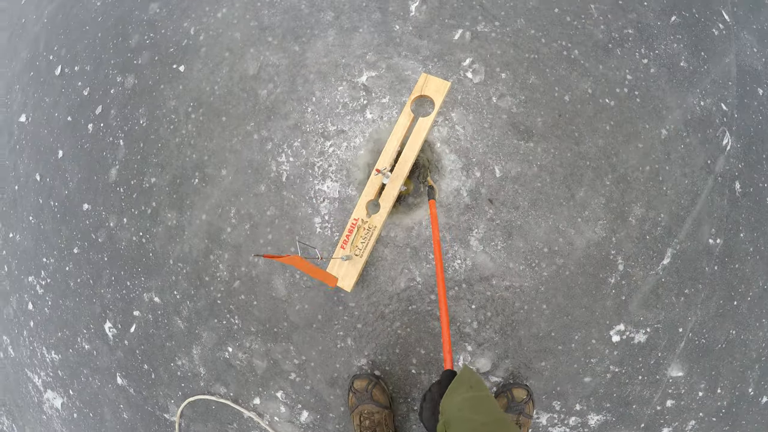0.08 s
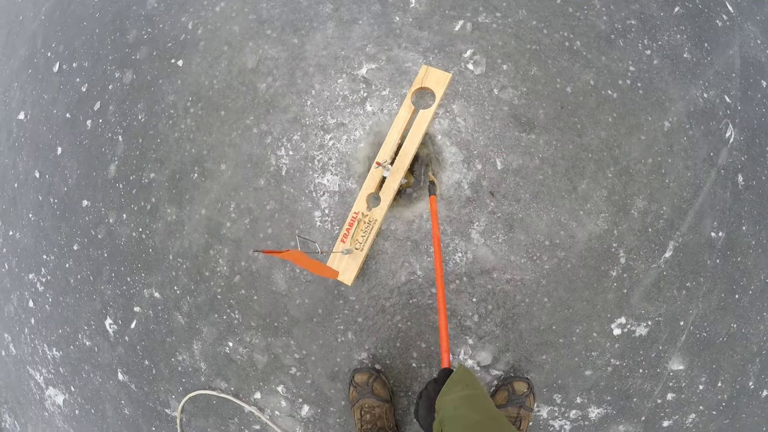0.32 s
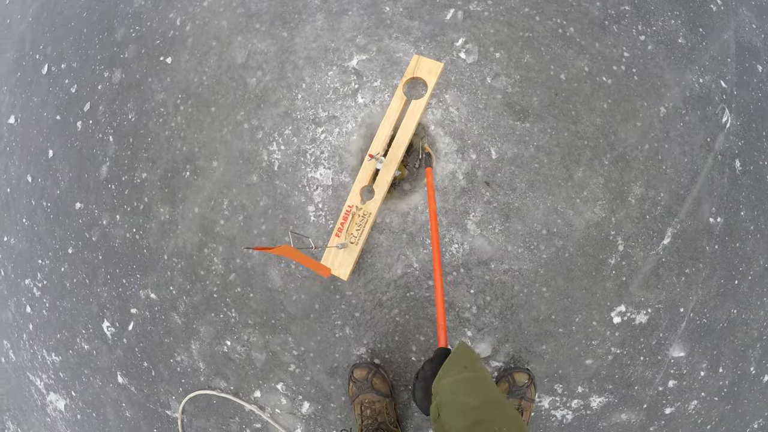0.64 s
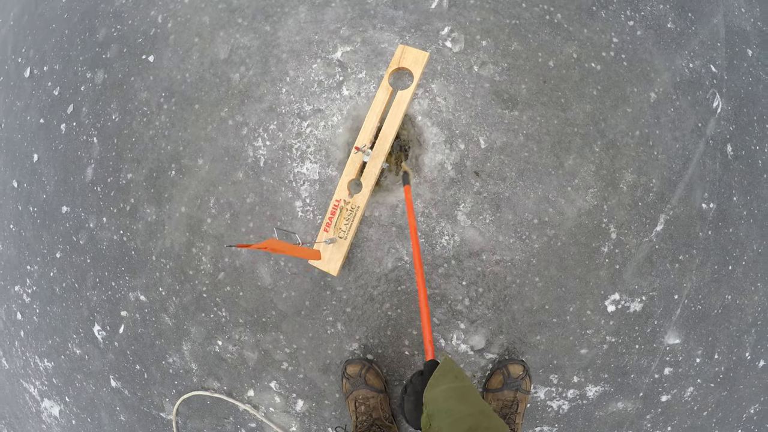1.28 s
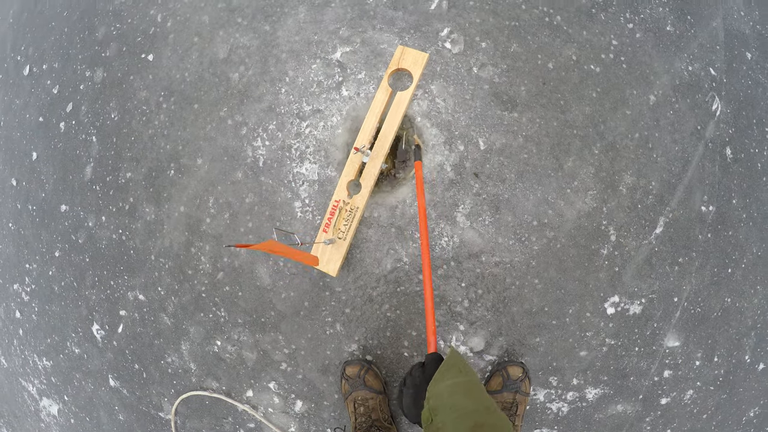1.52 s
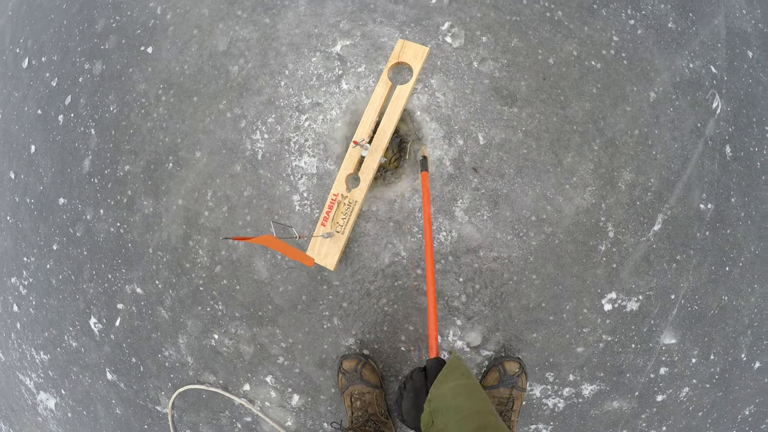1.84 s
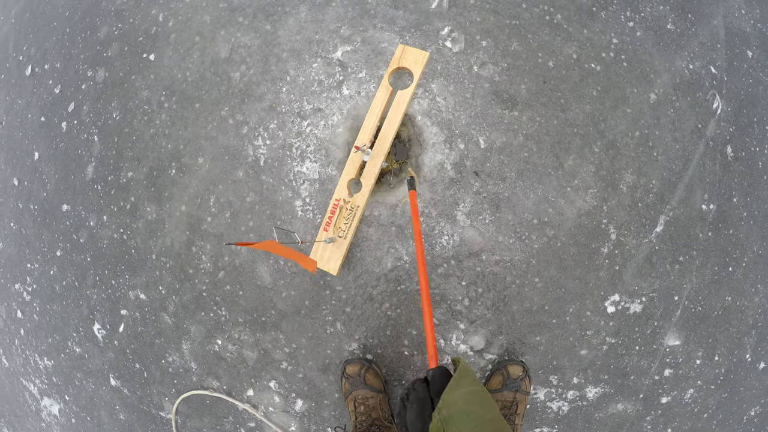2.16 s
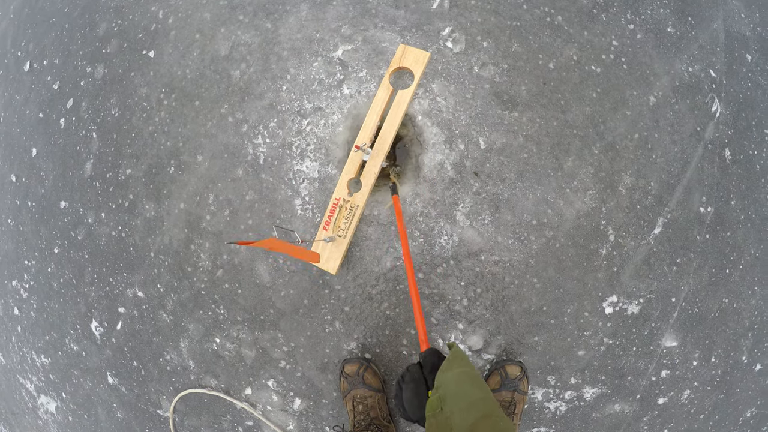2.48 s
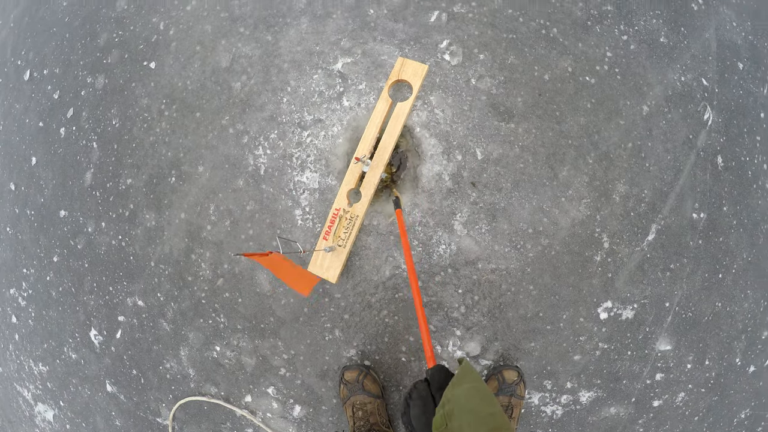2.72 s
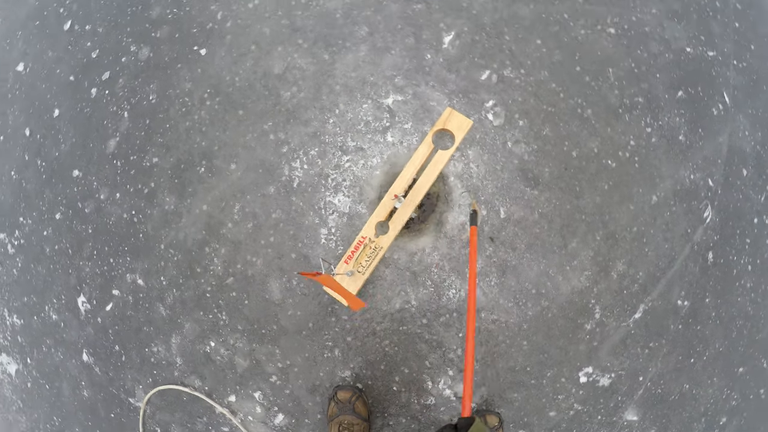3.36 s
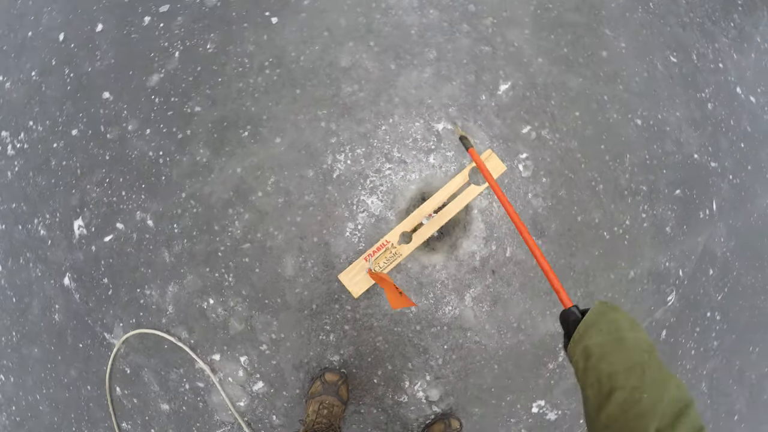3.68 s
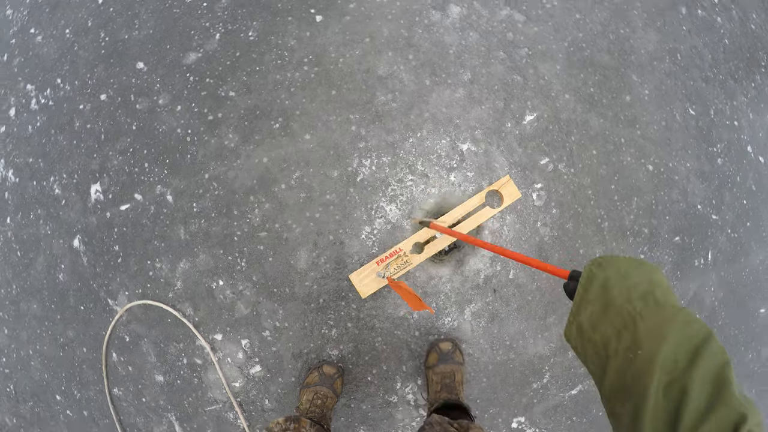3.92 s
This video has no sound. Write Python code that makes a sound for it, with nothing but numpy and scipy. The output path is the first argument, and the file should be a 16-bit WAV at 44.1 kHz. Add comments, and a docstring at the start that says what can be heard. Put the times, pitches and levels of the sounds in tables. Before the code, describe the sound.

Short chops and light scrapes at an ice fishing hole, with wind buffeting the microphone.

```python
"""A long-handled skimmer clears slush from a fishing hole in lake ice, about a metre below the microphone.
First come small chops, each a crunch of tiny fractures, and light scrapes. From half a second on, gusts
buffet the microphone. Two dull knocks follow, then the hardest chops (1.2 and 1.7 s), and loose chips and
drops plink in the hole. After a longer drag at 2.5 s the chops thin out. The strongest gust comes at 3.5 s,
then a last low knock. A limiter holds the wind's peaks, and the open lake gives no echo."""
import sys
import numpy as np
from scipy import signal
from scipy.fft import rfft, irfft, next_fast_len
from scipy.io import wavfile
from scipy.ndimage import uniform_filter1d, minimum_filter1d, map_coordinates

SR = 44100
rng = np.random.default_rng(int(sys.argv[2]) if len(sys.argv) > 2 else 0)


def to_wav(s):
    """Save 16-bit WAV."""
    ch = np.atleast_2d(s).T  # columns
    pcm = np.round(np.clip(ch, -1, 1) * 32767)  # PCM
    wavfile.write(sys.argv[1], SR, pcm.astype(np.int16))


N = 176400  # 4 seconds

# Faint background hiss, swelling near the end with a soft sleeve rustle.
# Each row: time in seconds, level in dB.
HISS_LEVELS = [(0, -51), (2.3, -52), (3.6, -52), (3.8, -48)]
# Tone of that hiss. Each row: frequency in Hz, level in dB.
HISS_TONE = [(100, 9), (2000, -6.5), (3500, -15.5), (6000, -19.5), (15000, -31.5)]
# Deep rumble under the wind. Each row: time in seconds, level in dB.
RUMBLE_LEVELS = [(0, -25.5), (1.7, -27), (2, -39.5), (2.62, -12), (2.72, -31), (2.86, -20), (2.96, -39),
                 (3.24, -19.5), (3.33, -28.5), (3.45, -7.5), (3.68, -26.5), (3.95, -23.5)]
# Tone of that rumble. Each row: frequency in Hz, level in dB.
RUMBLE_TONE = [(10, -3.5), (28, 2.5), (55, -2), (180, -17), (400, -55), (1000, -84)]
# Breeze between the gusts. Each row: time in seconds, strength in dB.
BREEZE_STRENGTHS = [(0, -27), (.18, -26.5), (.32, -27.5), (.37, -44), (.46, -45.5), (.52, -26), (.8, -27),
                    (1.02, -31), (1.22, -34.5), (1.3, -24), (1.62, -29), (1.94, -25), (2.1, -34.5),
                    (2.17, -26.5), (2.35, -37), (2.44, -28), (2.66, -36.5), (2.7, -28), (2.77, -45.5),
                    (3, -29.5), (3.15, -38), (3.3, -37), (3.38, -26), (3.62, -37.5), (3.92, -50), (4, -35)]
# Gusts. Each row: start in seconds, length in seconds, strength in dB, extra for large eddies in dB.
WIND_GUSTS = [(0.513, 0.02, -24, 3.5), (0.547, 0.028, -18, -2.5), (0.674, 0.022, -25, 7),
              (0.834, 0.056, -20.5, 3), (0.904, 0.042, -16.5, 5.5), (1.249, 0.052, -24, 8),
              (1.338, 0.094, -20, 3.5), (1.456, 0.1, -16, -2), (1.715, 0.021, -18.5, -3),
              (1.782, 0.005, -19.5, -4), (1.838, 0.09, -19, 2.5), (2.056, 0.021, -19, 4),
              (2.546, 0.028, -19.5, -6), (3.055, 0.034, -16, -0.5), (3.409, 0.027, -15.5, -12),
              (3.442, 0.061, -11.5, -9.5), (3.525, 0.054, -16, -1.5)]
# Eddies (swirls of air) on the microphone. Each row: centre frequency in Hz, level at full wind in dB,
# dB gained for each dB of wind, flutter in dB.
EDDY_BANDS = [(55.7, -16, 0.9, 3), (129.4, -15.5, 1.22, 2), (246.6, -14.5, 1.1855, 5),
              (475.6, -19.5, 2.03, 2.5), (797, -29.5, 2.25, 11.5), (1710, -77, 7.5, 14)]
FULL_WIND_DB, GUST_EDGE_DB_PER_S = -16, 1582
LARGE_EDDY_HZ = 200  # eddies below this pitch count as large

# Knocks on the ice. Each row: start in seconds, level in dB, pitch in Hz.
ICE_KNOCKS = [(0.6764, 1.5, 189), (1.1283, -3, 430), (3.843, -4.5, 55.6)]
# Chips and drops landing. Each row: start in seconds, level in dB, pitch in Hz, fade time in cycles.
CHIP_PLINKS = [(1.1847, -20, 4760, 5.4), (1.211, -23, 2900, 6), (1.217, -8, 4300, 2.6),
               (1.4024, -21.5, 2620, 3.3), (1.441, -24, 4730, 2.5), (1.4665, -32.5, 6300, 6.6),
               (1.6489, -15.5, 4800, 22), (1.663, -13, 3300, 3.4), (1.6958, -7, 4980, 6.2),
               (1.7716, -34, 4480, 5), (1.841, -21, 3800, 6.7), (2.228, -36.5, 2650, 9.9),
               (2.4044, -20, 3030, 3.1), (2.686, -28.5, 3060, 7.2), (2.886, -36, 3440, 5.6)]
SNAP_DB, SNAP_FADE_S = -13, 0.002  # the snap that starts a plink
# Hollow notes of the hole. Each row: pitch in Hz, width in Hz, level in dB.
HOLE_NOTES = [(780, 114, -0.5), (1145, 150, -0.5), (1805, 180, -6)]

# Strokes that crush the slush. Each row: start in seconds, length in seconds, level in dB,
# and how far the hole's ring lies above that level in dB.
SLUSH_STROKES = [(.003, 0.0023, -21.5, -4), (0.013, 0.0025, -32.5, 10.5), (0.041, 0.0034, -39.5, -16),
                 (.076, 0.0033, -46.5, -10), (.253, 0.0056, -45.5, 3), (0.368, .003, -40, -3),
                 (0.375, 0.019, -44.5, -0.5), (0.405, 0.014, -44, -9), (0.458, .004, -45, -5),
                 (0.6742, 0.0057, -28.5, 3.5), (.686, .022, -36, 2.5), (0.7861, 0.0019, -30.5, 0),
                 (1.1733, 0.015, -20, -11), (1.2116, 0.011, -19.5, -14), (1.314, 0.0034, -36.5, 12.5),
                 (1.362, 0.0013, -33, 12), (1.651, 0.019, -25.5, -7), (1.6922, 0.0006, -21, -9),
                 (1.695, .0018, -14.5, -9.5), (1.833, 0.021, -39.5, -1), (2.043, 0.0088, -36.5, 0),
                 (2.4044, 0.00084, -31, -17), (2.455, .092, -36.5, -2.5), (2.469, 0.0096, -26, -4),
                 (2.516, 0.0028, -29, 1), (2.543, 0.003, -32.5, 5), (2.774, 0.017, -38, -15),
                 (2.794, 0.0041, -32.5, -21), (2.812, 0.0023, -26.5, -18), (3.002, 0.0062, -36, -3),
                 (3.7775, 0.0014, -40.5, -15)]
DRAG_S = 0.02  # strokes at least this long drag
RISE_S, RELEASE_S = 0.0003, 0.0015
SETTLE_DB, SETTLE_S = -13.5, 0.011  # crumbs settling after each stroke
# Tone of breaking slush. Each row: frequency in Hz, level in dB.
SLUSH_TONE = [(150, -19), (500, 5.5), (1300, -8.5), (2800, 2), (5000, 0.5), (7000, -5.5), (10000, -14.5),
              (14000, -14), (16000, -22)]
CLUMP_DB, CLUMPS_PER_S = 5.5, 1100
GRAIN_HZ, GRAIN_SCATTER_DB = 4200, 4
# Light scrapes along the rim. Each row: start in seconds, length in seconds, level in dB.
RIM_SCRAPES = [(.12, 0.21, -61.5), (.37, 0.14, -55), (1.225, 0.16, -51), (2.07, 0.023, -52.5),
               (2.58, .2, -53), (2.925, 0.094, -52), (3.186, 0.05, -49.5)]
# Gritty tone of scraping. Each row: frequency in Hz, level in dB.
GRIT_TONE = [(800, -5), (2500, 3), (5500, -0.5), (7500, -10.5), (15000, -21)]
CATCH_DB, CATCHES_PER_S = 5.5, 85  # the skimmer sticks and slips
# Notes of the skimmer's cup. Each row: pitch in Hz, level in dB.
CUP_NOTES = [(1137, 2), (2300, -2.5), (2845, -4), (4160, -2.5), (4800, -6.5), (5200, -4), (5750, -8)]
CUP_WIDTH_HZ = 54

CEILING, LIMITER_S, TOP_HZ = 0.94, 0.008, 15600


def amp(db):
    """Turn decibels into a gain."""
    return 10 ** (np.asarray(db) / 20)


def unit(x):
    """Scale a signal to an average (rms) level of 1."""
    return x / np.sqrt(np.mean(x ** 2) + 1e-20)


def curve(rows):
    """Join (time, value) points into one value per sample."""
    return np.interp(np.arange(N) / SR, *np.transpose(rows))


def wobble(per_s):
    """A smooth curve through per_s random points a second."""
    return map_coordinates(rng.standard_normal(8192), [np.arange(N) * per_s / SR], mode="wrap")


def jolts(per_s):
    """Unevenly spaced jolts; each hits at once and fades until the next."""
    count = np.cumsum(per_s * np.exp(0.5 * wobble(per_s))) / SR
    height = rng.uniform(-0.5, 0.5, 4096)[count.astype(int) % 4096]
    jolt = height - count % 1
    return unit(jolt - jolt.mean())


def filtered(x, response):
    """Filter x; response gives the gain at each frequency in Hz."""
    size = next_fast_len(N + 8192)
    return irfft(rfft(x, size) * response(np.fft.rfftfreq(size, 1 / SR) + 0.01), size)[:N]


def noise(tone):
    """Noise of level 1, shaped by a tone table."""
    hz, db = np.transpose(tone)
    return unit(filtered(rng.standard_normal(N), lambda f: amp(np.interp(np.log(f), np.log(hz), db))))


def even(x, span_s):
    """Iron out swells slower than span_s, leaving a level of 1."""
    span = int(span_s * SR) + 1
    power = uniform_filter1d(uniform_filter1d(x * x, span), span)
    return unit(x / np.sqrt(abs(power) + 1e-9))


def rings(start_s, gain, hz, cycles, samples=800):
    """Add up short fading tones that bend slightly up in pitch."""
    t = np.arange(samples) / SR
    age = t * (hz / cycles)[:, None]
    bend = 1 + 0.016 * age
    tones = gain[:, None] * np.exp(-age) * np.sin(2 * np.pi * hz[:, None] * t * bend)
    where = (start_s * SR).astype(int)[:, None] + np.arange(samples)
    return np.bincount(where.ravel(), tones.ravel(), N)[:N]


def bursts(rows, release_s):
    """A loudness curve from (start, length, dB) rows: each rises fast, holds, then fades."""
    t = np.arange(SR // 2) / SR
    power = np.zeros(N + SR)
    for start, length, db in rows:
        shape = np.clip(t / RISE_S, 0, 1) * np.exp(-np.maximum(t - length, 0) / release_s)
        power[int(start * SR):][:len(t)] += (amp(db) * shape) ** 2
    return np.sqrt(power[:N])


def background_hiss():
    """Faint background hiss, swelling near the end with a soft sleeve rustle."""
    return amp(curve(HISS_LEVELS)) * noise(HISS_TONE)


def wind():
    """Stronger wind sheds smaller eddies, so gusts sound brighter and rougher. A rumble rolls beneath."""
    t = np.arange(N) / SR
    puffs_db = 4 * np.tanh(2 * wobble(per_s=45))
    small_power = large_power = amp(curve(BREEZE_STRENGTHS) + puffs_db) ** 2
    for start, length, db, large_db in WIND_GUSTS:
        outside_s = np.clip(np.maximum(start - t, t - start - length), 0, 0.5)
        gust_power = amp(db - GUST_EDGE_DB_PER_S * outside_s) ** 2
        small_power = small_power + gust_power
        large_power = large_power + gust_power * amp(large_db) ** 2
    flutter = jolts(per_s=170)
    sound = amp(curve(RUMBLE_LEVELS)) * even(noise(RUMBLE_TONE), span_s=0.053)
    for hz, db, growth, flutter_db in EDDY_BANDS:
        strength_db = 10 * np.log10(large_power if hz < LARGE_EDDY_HZ else small_power) - FULL_WIND_DB
        ragged = rng.standard_normal(N) * amp(flutter_db * flutter)
        band = filtered(ragged, lambda f: (1 + 1j * (f / hz - hz / f)) ** -3.176)  # keep what is near hz
        sound += amp(db + growth * strength_db) * even(unit(band), span_s=0.028)
    return filtered(sound, lambda f: 1 / np.sqrt(1 + (f / 4400) ** 10))  # cut above 4400 Hz


def knocks():
    """Soft bumps against the thick ice, over in a cycle or two."""
    start, db, hz = np.transpose(ICE_KNOCKS)
    bumps = rings(start, amp(db), hz, cycles=0.57, samples=4000)
    return filtered(bumps, lambda f: 1 / (1 + 1j * f / 1800) ** 3)  # dull the treble


def plinks():
    """Chips and drops land, each with a snap and a brief ring."""
    start, db, hz, cycles = np.transpose(CHIP_PLINKS)
    hits = np.bincount((start * SR).astype(int), amp(db + SNAP_DB), N)
    fades = signal.lfilter([1], [1, -np.exp(-1 / (SNAP_FADE_S * SR))], hits)
    return rings(start, amp(db), hz, cycles) + fades * noise(SLUSH_TONE)


def hole():
    """Strokes that dig deep also ring the hollow of the hole."""
    def hollow(f):
        return sum((-1) ** k * amp(db) / (1 + 1j * (f * f - hz * hz) / (f * width))
                   for k, (hz, width, db) in enumerate(HOLE_NOTES))
    ring = even(filtered(rng.standard_normal(N), hollow), span_s=0.01)
    digs = [(start, length, db + ring_db) for start, length, db, ring_db in SLUSH_STROKES]
    return ring * bursts(digs, 2 * RELEASE_S)


def ice_grains(per_s):
    """Bits of ice of random size ring briefly at random moments."""
    when, size, pitch = rng.random((3, 8000))[:, :int(per_s * N / SR)]
    hz = np.clip(GRAIN_HZ * (pitch / (1 - pitch)) ** 0.25, 800, TOP_HZ)
    gain = amp(-GRAIN_SCATTER_DB * np.log(size))
    return unit(rings(when * N / SR, gain, hz, cycles=4))


def skimmer():
    """Quick chops crush the slush at once; drags and scrapes stick and slip. All of them ring the cup."""
    fractures = unit(noise(SLUSH_TONE) * amp(CLUMP_DB * wobble(CLUMPS_PER_S)))
    crunch = even(fractures + amp(-1) * ice_grains(per_s=1800), span_s=0.002)
    crumbs = noise(GRIT_TONE) + amp(-3) * ice_grains(per_s=320)
    grit = even(crumbs * amp(CATCH_DB * jolts(CATCHES_PER_S)), span_s=0.06)
    strokes = [row[:3] for row in SLUSH_STROKES]
    chops = bursts([row for row in strokes if row[1] < DRAG_S], RELEASE_S)
    drags = bursts([row for row in strokes if row[1] >= DRAG_S], RELEASE_S)
    drags *= unit(amp(CATCH_DB * jolts(2 * CATCHES_PER_S)))
    scrapes = bursts(RIM_SCRAPES, RELEASE_S)
    settling = amp(SETTLE_DB) * bursts(strokes, SETTLE_S)
    contact = np.hypot(chops, drags) * crunch + np.hypot(scrapes, settling) * grit

    def cup(f):
        return 1 + sum(amp(db) / (1 + 2j * (f - hz) / CUP_WIDTH_HZ) for hz, db in CUP_NOTES)
    return filtered(contact, cup)


def scene():
    """The work at the hole, the wind and a faint hiss, in one channel."""
    return (skimmer() + hole() + knocks() + plinks() + wind() + background_hiss())[None]


def record(dry):
    """A fast limiter turns down the loudest peaks, then the highest treble is cut."""
    span = int(LIMITER_S * SR) + 1
    needed_gain = np.minimum(1, CEILING / (abs(dry[0]) + 1e-9))
    held_gain = minimum_filter1d(needed_gain, 2 * span)
    smooth_gain = uniform_filter1d(uniform_filter1d(held_gain, span), span)
    return filtered(dry[0] * smooth_gain, lambda f: 1 / np.sqrt(1 + (f / TOP_HZ) ** 120))[None]


dry = scene()
out = record(dry)
to_wav(out)
```